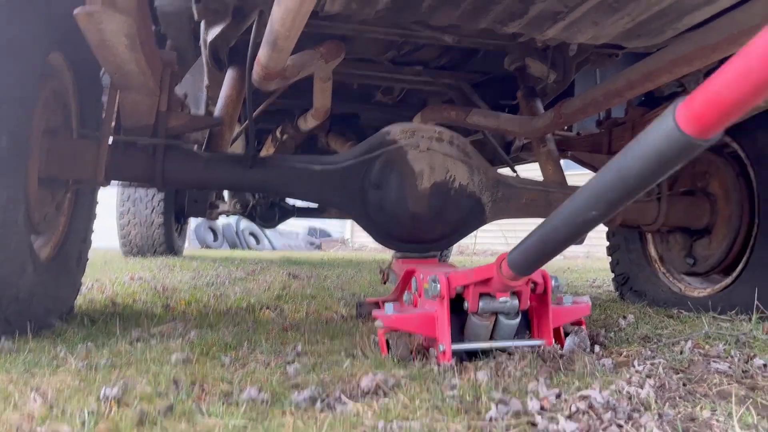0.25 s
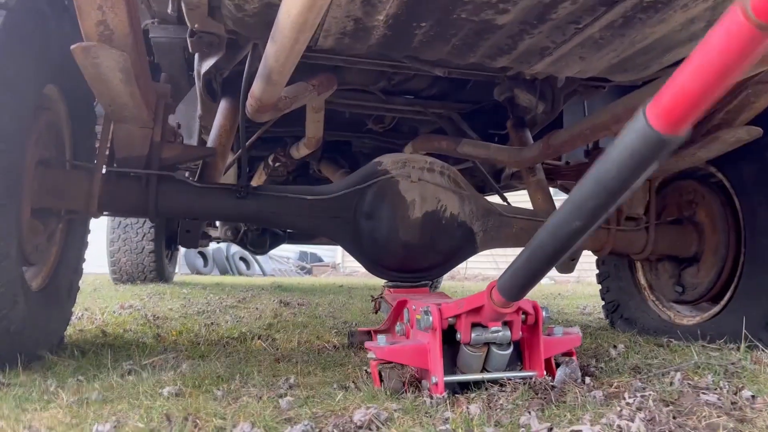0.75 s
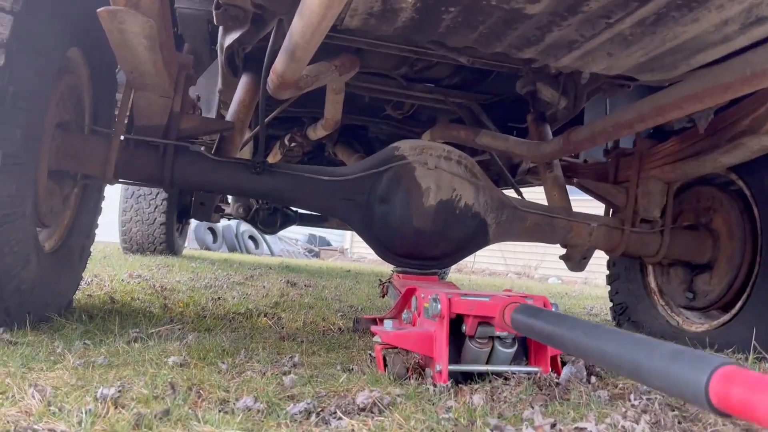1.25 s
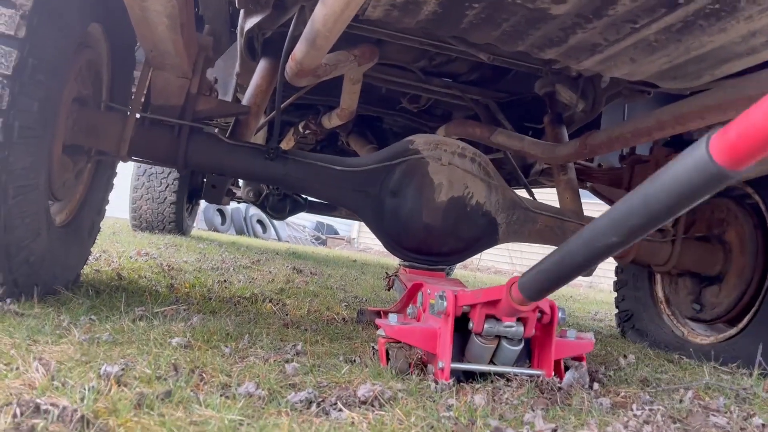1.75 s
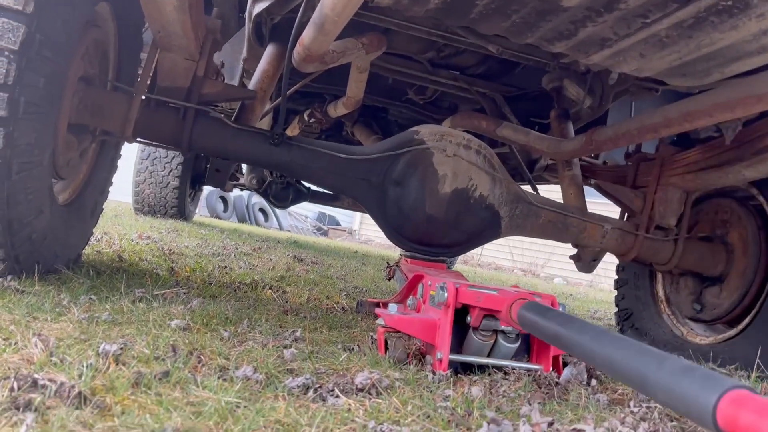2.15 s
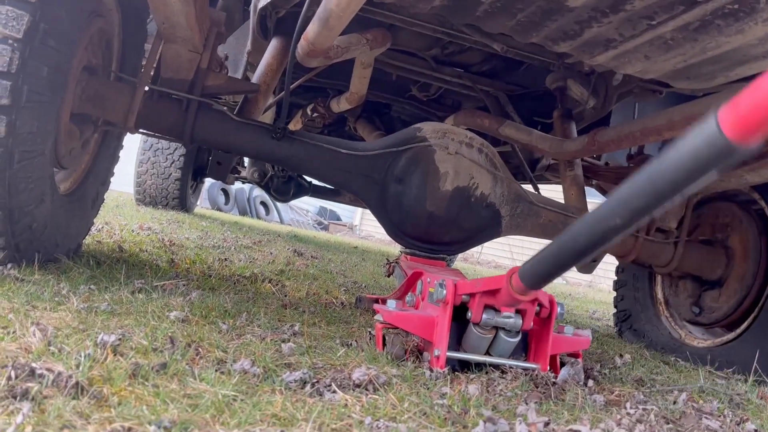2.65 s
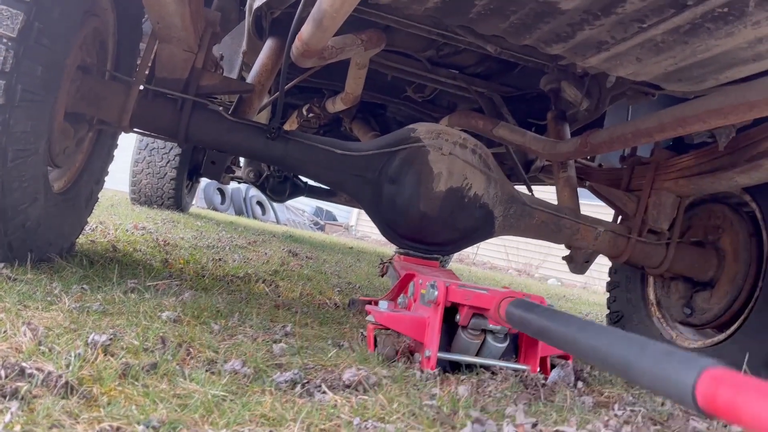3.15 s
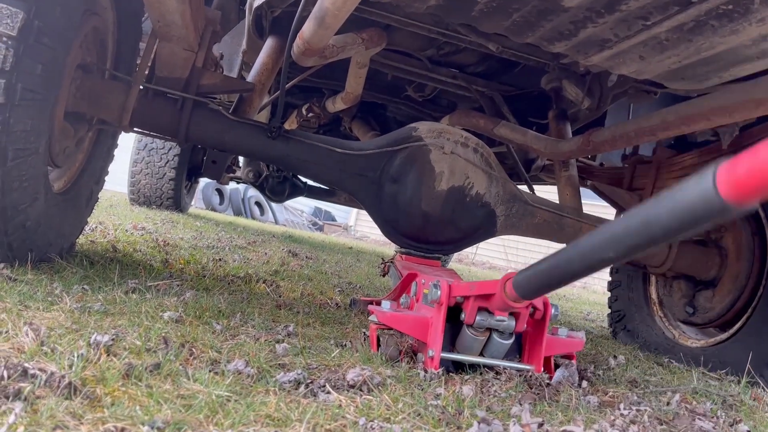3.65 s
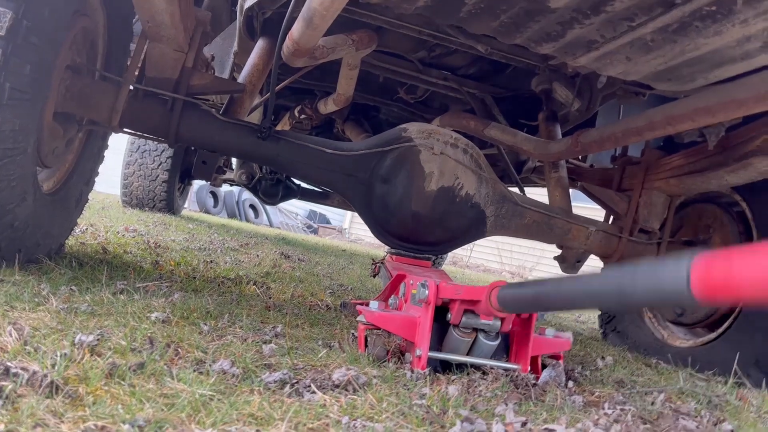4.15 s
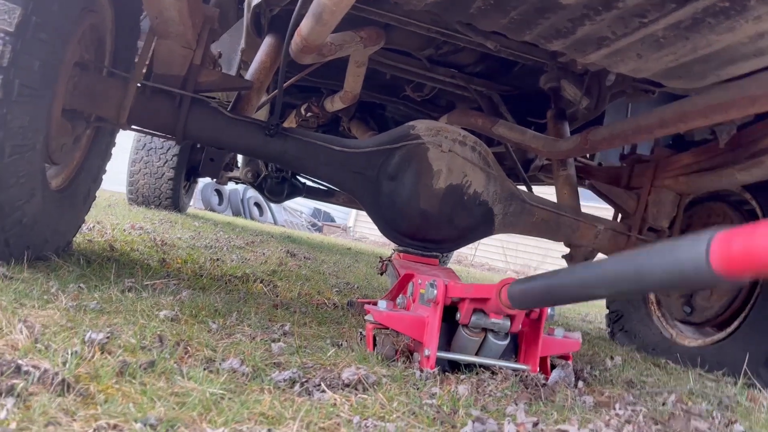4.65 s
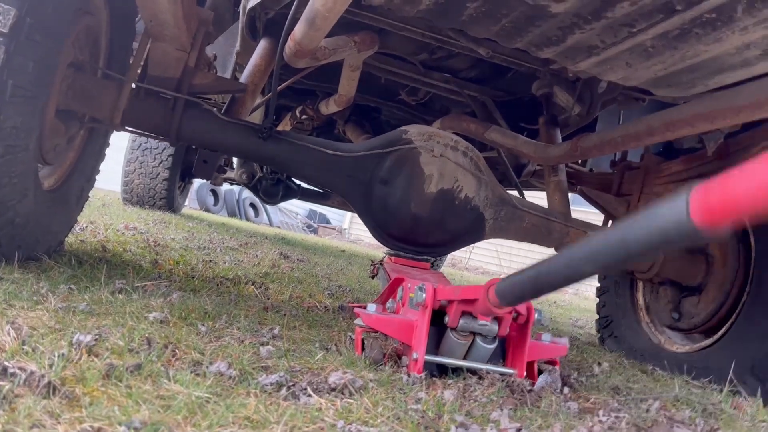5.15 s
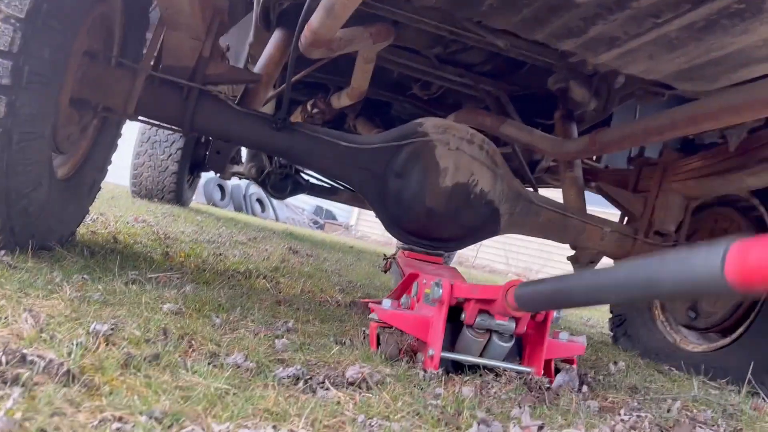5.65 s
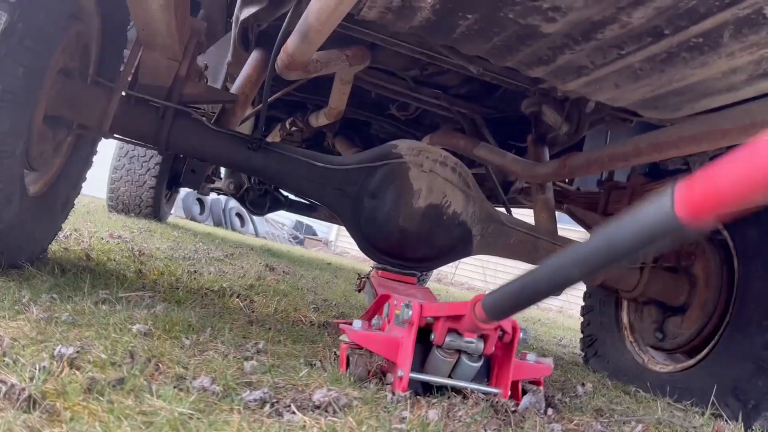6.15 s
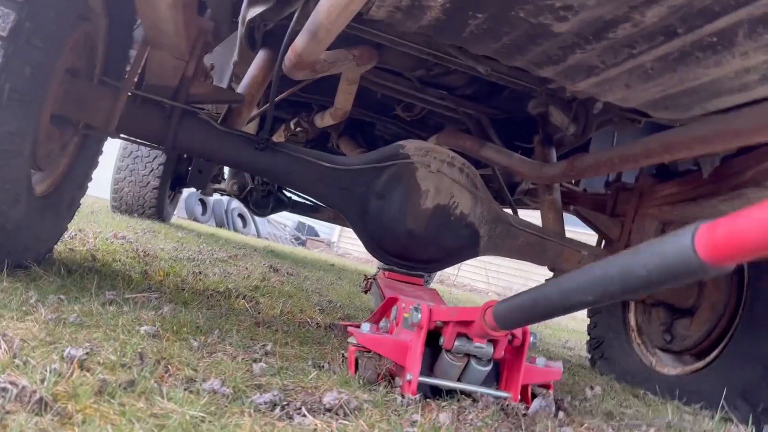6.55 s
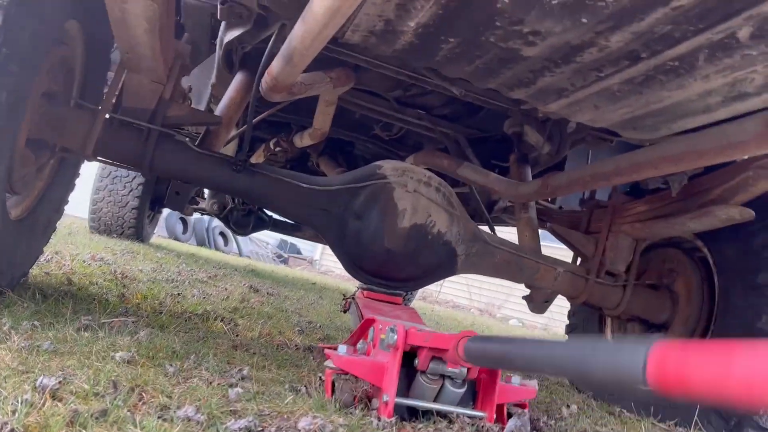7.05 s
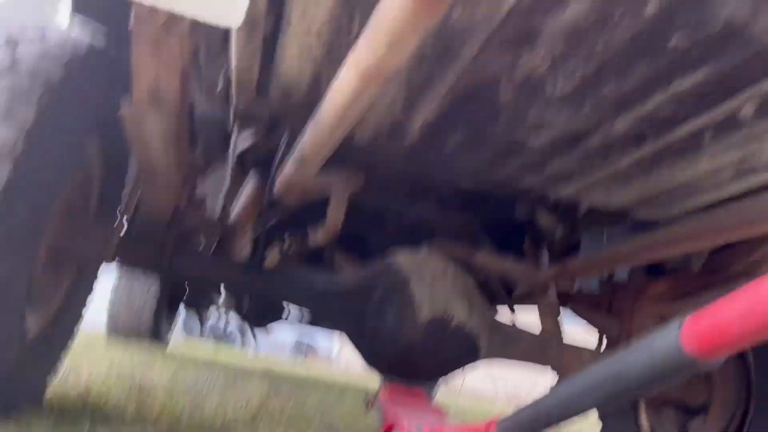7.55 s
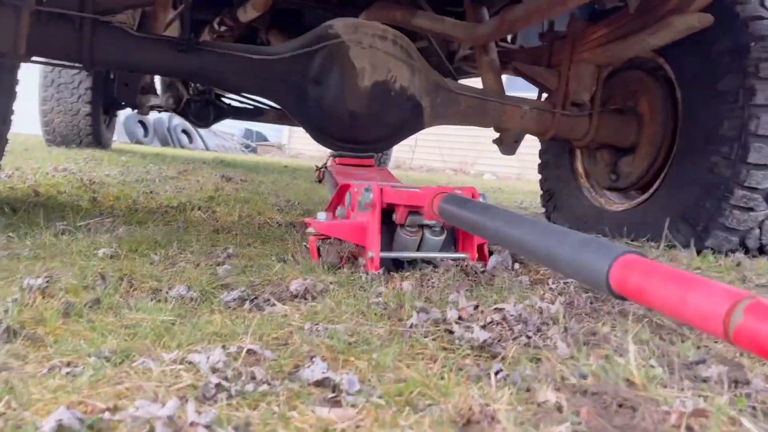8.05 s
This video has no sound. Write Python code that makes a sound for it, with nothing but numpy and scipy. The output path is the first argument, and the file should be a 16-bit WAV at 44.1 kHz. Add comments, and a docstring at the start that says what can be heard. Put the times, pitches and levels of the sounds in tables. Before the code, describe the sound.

Repeated metal clanks and dry ticks from a hydraulic floor jack being pumped, with faint pivot rubbing and one wind thump.

```python
"""A steel floor jack on grass is pumped by its long handle under a truck axle.
Its loose pins clank at the ends of each stroke, the loaded frame ticks and the wheels knock on the
ground. The pivots rub and squeak once, cloth swishes with the handle, and oil groans and hisses as
it is forced through the valve. Behind it lie a far rumble and a steady outdoor wash of noise,
and one gust of wind thumps the microphone."""
import sys
import numpy as np
from scipy import signal
from scipy.fft import rfft, irfft, next_fast_len
from scipy.io import wavfile
from scipy.ndimage import uniform_filter1d

SR = 44100
rng = np.random.default_rng(int(sys.argv[2]) if len(sys.argv) > 2 else 0)


def waveform_to_disk(signal):
    """Save audio, clipped to [-1, 1], as 16-bit WAV at the path in sys.argv[1]."""
    frames = np.transpose(np.atleast_2d(signal))
    scaled = np.clip(frames, -1, 1) * 32767
    samples = np.round(scaled).astype(np.int16)
    wavfile.write(sys.argv[1], SR, samples)


N = 366030

# The notes the jack's steel rings at: f/Hz, level/dB, time to fade by 60 dB/s
STEEL_NOTES = [(448.5, -7.5, 0.066), (946, -9.5, 0.078), (1203, 6, 0.015), (1510, -8.5, 0.17),
               (1764, -7, 0.15), (2272, -1.5, 0.076), (2787, 6.5, 0.039), (3190, -1, 0.057),
               (3480, -6, 0.069), (4300, 7.5, 0.069), (4900, -15, 0.44), (6080, -3.5, 0.046),
               (8600, 11, 0.051)]
# Metal hitting metal: t/s, level/dB, main pitch f/Hz, heaviness/dB, extra sharpness/dB
CLANKS = [(0.087, -26.5, 1273, 3, 3), (0.096, -26.5, 1670, 10.5, 13), (0.13, -44, 5500, -5, 16),
          (0.5027, -19, 4410, 2, 3), (0.545, -30, 1545, 1, 2), (1.375, -37, 5500, 6, 10),
          (2.3415, -11.5, 3320, -4, -5.5), (2.347, -13, 3660, 2, -13), (2.354, -19.5, 2200, 4, 2),
          (2.692, -22, 1990, 13, 3.5), (2.704, -28, 1920, 5, 0), (2.729, -30, 1700, 2, 0),
          (2.742, -27, 1820, 7, 3), (3.256, -26.5, 3940, 6.5, 5), (3.598, -22.5, 2080, 14, 1),
          (3.61, -28, 1760, 7, 8), (3.635, -30.5, 2180, 4, 0), (3.652, -23.5, 1400, 5, -2),
          (3.665, -31, 1760, 3, -2), (4.141, -26, 4300, 4, 12), (4.147, -21, 1620, -2, 7),
          (4.152, -10, 2860, 9, -4), (4.158, -11.5, 4540, 2, -1), (4.163, -14, 1835, 6.5, 6),
          (4.168, -27, 4940, 10, -3), (4.491, -24, 2050, 14.5, 0), (4.498, -27, 1840, -7, 8),
          (4.528, -27.5, 2080, 4, 5), (4.55, -24.5, 1760, 6, -5), (5.078, -25, 4270, 12, 0),
          (5.084, -14, 2920, 10, -3), (5.09, -11.5, 4550, 10.5, -4.5), (5.102, -17.5, 2380, 10, -8),
          (5.13, -18.5, 3950, 0, 0), (5.134, -30, 4960, 10, -4), (5.146, -26, 1670, -4, 0),
          (5.434, -23.5, 1700, 9, 5), (5.443, -26, 1790, 7, 0), (5.464, -26, 2080, 5, -2),
          (5.492, -24, 1800, 9, 0), (5.658, -33.5, 5000, 4, 7), (6.059, -14.5, 1510, -14, 0),
          (6.0635, -8, 2760, 3, -7), (6.075, -10, 6200, 4, -6.5), (6.084, -14, 1950, 5.5, -3.5),
          (6.097, -23, 1700, 8, 0), (6.4, -21.5, 2040, 9.5, 3), (6.41, -25, 1650, 8, 6),
          (6.432, -31, 1890, -8, 5), (6.462, -23, 1820, 9, -5), (6.641, -34.5, 4700, 1, 4),
          (6.866, -26, 1440, 6, 0), (7.06, -23, 2740, 16, -3), (7.0744, -8, 2500, 2, 2.5),
          (7.081, -15, 2220, 7, -7), (7.095, -19, 1580, 3, -11), (7.115, -14.5, 4450, -5, -3),
          (7.393, -21, 2320, 12.5, -0.5), (7.403, -27.5, 2360, 10, 9), (7.424, -25.5, 1700, 4, 1),
          (7.464, -27, 1740, 14, 0), (8.212, -27, 1350, 12, 22), (8.231, -28.5, 4560, -5, 8)]
def clank(db, hz, heavy_db, sharp_db):
    """A loose pin hits the steel, which rattles and rings. The sound starts after a 200-sample lead-in."""
    t = np.arange(7800) / SR
    near = lambda f, octaves: np.exp(-(np.log2((f + 1) / hz) / octaves) ** 2)  # 1 at the blow's pitch
    ring = 0
    for (f, note_db, fade_s), luck in zip(STEEL_NOTES, rng.random((len(STEEL_NOTES), 4, 1))):
        # notes near the blow's pitch ring most, above all the long ones
        boost_db = (7 + 24 * fade_s) * near(f, 0.083) - 4 + 3 * luck[2]
        if f < 1000:  # a heavy blow brings out the frame's low notes
            boost_db += 4 + 0.12 * heavy_db
        detuned_hz = f * (1 + 0.0031 * (2 * luck[3] - 1))
        tone = np.sin(2 * np.pi * (detuned_hz * t + luck[:2]))
        ring += gain_of(note_db + boost_db - 60 * t / fade_s) * tone
    # the first contact is hardest, then the pin bounces in its hole
    crack = gain_of(12 - 60 * t / .018) + gain_of(-60 * t / .09)
    bounce = 1 + .4 * wobble(len(t), 60) * np.minimum(t / .004, 1)
    rattle = rng.standard_normal((2, len(t))) * crack * abs(bounce)
    # the steel lifts the rattle at its stronger notes
    strong_hz = [f for f, note_db, _ in STEEL_NOTES if note_db > -9]
    lift_db = lambda f: sum(8.6 / (1 + ((f - note) / (0.041 * note)) ** 2) for note in strong_hz) - 3
    rattle = filtered(rattle, lift_db)
    shake = 1 + .4 * wobble(len(t), 150) * np.exp(-t / .015)  # loose joints shake, then settle
    ring *= gain_of(-8 + 0.62 * heavy_db) * shake  # heavy blows ring more
    sound = np.pad((ring + rattle) * np.minimum(t / .0004, 1), ((0, 0), (200, 0)))
    # smaller parts and harder hits sound brighter
    treble_db = sharp_db - 13 + 16 * np.log2(hz / 2000) + 0.76 * (db + 13)
    colour = [(150, heavy_db - 13), (600, heavy_db - 3.5), (920, heavy_db), (hz, -3),
              (min(2 * hz, 9000), treble_db), (10000, treble_db),
              (14000, treble_db - 13), (16500, treble_db - 17)]
    focus_db = lambda f: 3 * near(f, 0.07) + (6 - .45 * heavy_db) * near(f, 0.25)
    sound = filtered(sound, lambda f: look_up(colour, f) + focus_db(f))
    sound = sound[:, :7000] * np.minimum(np.arange(7000, 0, -1) / 2000, 1)
    rough_peak = 3.11 * np.sqrt(np.mean(sound[:, 200:500] ** 2))
    return gain_of(db) * sound / rough_peak


# Dry ticks of the frame: t/s, level/dB, f/Hz, snap compared with the tone/dB
TICKS = [(0.858, -29, 1210, -17), (0.922, -30, 580, -23), (1.095, -32.5, 990, -18),
         (1.176, -27.5, 1250, -27), (1.32, -23.5, 1210, 3), (1.353, -28, 1310, -22), (1.736, -32, 980, -4),
         (1.994, -30.5, 1020, -5), (2.285, -33.5, 805, -14), (2.454, -36, 900, -8),
         (2.491, -28.5, 905, -20), (2.916, -31, 1050, 0), (2.979, -32, 1000, 7), (3.028, -24.5, 1190, 3),
         (3.194, -30.5, 884, -18), (3.288, -30.5, 1360, -20), (3.419, -25.5, 940, -27),
         (3.783, -30, 1500, -23), (3.896, -19.5, 1240, 6), (3.905, -33, 1500, 2), (4.289, -31, 1680, -15),
         (4.297, -24.5, 920, -6), (4.316, -33.5, 1730, -15), (4.392, -25.5, 740, -28),
         (4.679, -30, 1740, -7), (4.792, -20, 1100, 7.5), (4.886, -31, 760, -18), (5.247, -29.5, 860, -22),
         (5.572, -33, 1550, -20), (5.765, -29.5, 1780, 9), (5.817, -19, 1120, 1.5), (5.978, -28, 950, 12),
         (6.21, -26, 835, -12), (6.571, -33.5, 1680, -15), (7.204, -31, 900, 14), (7.274, -31, 1460, -15),
         (7.22, -24, 870, -25), (8.287, -26, 1060, 0)]
def tick(db, hz, snap_db):
    """The loaded frame settles: a short tone, a bright snap and a faint echo off ground and truck."""
    t = np.arange(SR // 16) / SR
    snap = np.sin(2 * np.pi * 3400 * t) + 0.61 * np.sin(2 * np.pi * 2200 * t)
    snap *= gain_of(snap_db - 60 * t / 0.0051)
    click = (np.sin(2 * np.pi * hz * t) + snap) * struck(t, rise_s=0.001, fade_s=0.0093)
    echo = filtered(rng.standard_normal((2, len(t))), lambda f: -9 * abs(np.log2((f + 1) / (0.83 * hz))))
    sound = click + 0.14 * normalised(echo) * struck(t, rise_s=0.00091, fade_s=0.065)
    return gain_of(db) * sound / abs(click).max()


# Dull knocks of the wheels: t/s, level/dB, f/Hz
KNOCKS = [(0.834, -35, 434), (0.851, -31, 440), (1.354, -38, 464), (1.734, -38, 426), (6.07, -27.5, 499)]
def knock(db, hz):
    """A wheel presses into the ground with a short, low ring."""
    t = np.arange(SR // 10) / SR
    ring = np.sin(2 * np.pi * hz * t) * struck(t, rise_s=0.00069, fade_s=0.097)
    return np.tile(gain_of(db) * ring, (2, 1))


# The path of the one squeak: t/s, f/Hz, level/dB
SQUEAK = [(2.845, 2210, -64), (2.875, 2250, -55), (2.9, 2265, -48), (2.915, 2330, -45.5),
          (2.925, 2290, -60)]
def squeak():
    """A dry pivot slips unevenly, making a shaky, sliding tone."""
    times, hz, db = np.transpose(SQUEAK)
    t = np.arange(times[0], times[-1], 1 / SR)
    phase = 2 * np.pi * np.cumsum(np.interp(t, times, hz)) / SR
    tone = (np.sin(phase) + 0.35 * np.sin(2 * phase)) * gain_of(np.interp(t, times, db))
    tone *= (1 + 0.4 * wobble(len(t), 80)) * signal.windows.tukey(len(t), .1)
    out = np.zeros((2, N))
    add(out, times[0], np.tile(tone, (2, 1)))
    return out


# Handle swings: fastest moment t/s, 12 dB rise time/s, 12 dB fall time/s, cloth level/dB, pivot level/dB
SWINGS = [(.34, 0.61, 0.11, -57, -52), (.6, 0.38, 0.13, -58, -52), (.86, 0.084, 0.37, -56.5, -49),
          (1.18, 0.093, 0.92, -53.5, -45.5), (1.58, 0.07, 0.084, -46, -44), (1.73, 0.046, 0.035, -55, -46),
          (2.16, 0.55, 0.25, -55.5, -48), (2.54, 0.29, 0.12, -51, -43.5), (2.72, 0.026, 0.025, -48, -48),
          (2.89, 0.29, 0.078, -55, -51), (3.03, 0.1, 0.58, -54, -45), (3.49, 0.22, 0.11, -49, -45.5),
          (3.64, 0.047, 0.067, -52, -45), (3.74, 0.039, 0.056, -51, -44), (3.95, 0.12, 0.19, -49, -42.5),
          (4.36, 0.16, 0.092, -46, -44), (4.53, 0.047, 0.2, -51.5, -43), (4.891, 0.11, 0.19, -48, -40),
          (5.31, 0.26, 0.079, -48, -44.5), (5.456, 0.021, 0.046, -44, -40), (5.6, 0.1, 0.072, -52.5, -43.5),
          (5.9, 0.19, 0.17, -48.5, -39.5), (6.28, 0.24, 0.091, -51, -43.5), (6.42, 0.027, 0.14, -52, -43.5),
          (6.898, 0.048, 0.04, -44, -35.5), (7.27, 1, 0.088, -52, -45.5), (7.43, 0.035, .1, -60, -48),
          (7.56, 0.16, 0.1, -57.5, -47), (8.021, 0.19, 0.049, -47, -42), (8.2, 0.32, 0.28, -53.5, -46.5)]
def swing_loudness(column):
    """A handle sound is loudest when the swing is fastest, and fades away on both sides."""
    t, power = np.arange(0, N + 64, 64) / SR, 0
    for swing in SWINGS:
        fastest, rise, fall = swing[:3]
        away = np.where(t < fastest, (fastest - t) / rise, (t - fastest) / fall)
        power += gain_of(swing[column] - 12 * away ** 1.06) ** 2
    return np.interp(np.arange(N) / SR, t, np.sqrt(power))


# Tone colour of the cloth: f/Hz, relative level/dB
CLOTH_COLOUR = [(1500, -7), (3300, -2.5), (5300, 1.5), (7000, -5), (9000, -4.5), (12000, -14.5),
                (15500, -14)]
def cloth_swish():
    """Cloth moves with the handle and makes a bright hiss."""
    hiss = noise(lambda f: look_up(CLOTH_COLOUR, f), 256, flicker_db=2.5, patch_s=0.028, patch_hz=2450)
    return hiss * swing_loudness(column=3)


# Tone colour of the pivots: f/Hz, relative level/dB
PIVOT_COLOUR = [(400, -4.5), (1000, 6.5), (1900, 0), (2600, -6), (3300, -5.5), (4500, -13.5), (7000, -46)]
def pivot_rub():
    """The pivots rub as the handle swings, with about 110 tiny crackles a second."""
    rub = noise(lambda f: look_up(PIVOT_COLOUR, f), 256, flicker_db=2.03, patch_s=.03, patch_hz=700)
    strengths = gain_of(3 * np.minimum(rng.exponential(1, N), 2))
    clicks = uniform_filter1d(strengths * (rng.random(N) < 110 / SR), 24)
    crackles = signal.lfilter([1.2], [1, -np.exp(-1 / (.0013 * SR))], clicks)  # each dies in a few ms
    return normalised(rub * (1 + 0.94 * crackles)) * swing_loudness(column=4)


# The pitches the oil groans at: f/Hz, width/Hz, relative level/dB
GROAN_BANDS = [(1494, 200, 15), (1745, 130, 10), (2290, 240, -1), (3360, 910, -7.5)]
# Pushes of oil: start t/s, length/s, level/dB
OIL_PUSHES = [(.35, 0.58, -59), (1.45, 0.35, -51.5), (3.058, 0.6, -48), (3.606, 0.43, -50),
              (5.1, 0.31, -47.5), (5.465, 0.29, -47), (7.188, 0.16, -46.5), (7.486, 0.12, -47),
              (7.63, 0.23, -46.5)]
def oil_groan():
    """Oil forced through the valve groans at fixed pitches; each push swells and fades."""
    def valve_db(f):
        bands = (gain_of(2 * db) / (1 + (2 * (f - hz) / width) ** 4) for hz, width, db in GROAN_BANDS)
        return 10 * np.log10(sum(bands))
    groan = noise(valve_db, 1024, flicker_db=4.5, patch_s=.04, patch_hz=300)
    t, pressure = np.arange(N) / SR, 0
    for start, length, db in OIL_PUSHES:
        pressure += gain_of(db) * np.sin(np.pi * np.clip((t - start) / length, 0, 1)) ** 0.85
    return pressure * groan


# Jets of oil: start t/s, length/s, level/dB, first f/Hz, last f/Hz
OIL_JETS = [(1.503, 0.26, -64, 3280, 3380), (1.84, 0.21, -62, 3150, 4060), (2.385, 0.23, -61, 3200, 3180),
            (3.002, 0.62, -60.5, 3450, 3220), (5.53, 0.16, -62, 3250, 3380), (5.684, 0.25, -64, 3400, 3450)]
def oil_hiss(width_hz=220):
    """Oil squirts through a narrow opening, with a hiss whose pitch drifts with the pressure."""
    out = np.zeros((2, N))
    lowpass = signal.butter(2, width_hz / 2, fs=SR, output="sos")
    for start, length, db, from_hz, to_hz in OIL_JETS:
        t = np.arange(0, length, 1 / SR)
        phase = 2 * np.pi * np.cumsum(from_hz + (to_hz - from_hz) * t / length) / SR
        slow_noise = signal.sosfilt(lowpass, rng.standard_normal((2, 2, len(t))))
        hiss = slow_noise[0] * np.cos(phase) - slow_noise[1] * np.sin(phase)  # moved up to the pitch
        add(out, start, gain_of(db) * normalised(hiss) * np.sin(np.pi * t / length) ** 0.44)
    return out


# Swirls of air in the gust: middle t/s, level/dB, f/Hz, length/cycles
SWIRLS = [(3.299, -21.5, 56, 2.6), (3.636, -19, 102, 0.88), (3.642, -10.5, 168, 1.6), (3.672, -19, 133, 4),
          (3.702, -16.5, 100, 5.3), (3.72, -15, 141, 2.4), (3.741, -7, 153, 0.77), (3.756, -19.5, 80, 3.4),
          (3.795, -19, 87, 1.2), (3.848, -16, 126, 1), (3.863, -25, 44.7, 1.5)]
def wind_gust():
    """Each swirl pushes the microphone back and forth for a moment, making a low thump."""
    out = np.zeros((2, N))
    t = np.arange(-2205, 2205) / SR
    for middle, db, hz, cycles in SWIRLS:
        phase = 2 * np.pi * (hz * t + rng.random((2, 1)))
        push = np.cos(phase) + 0.3 * np.cos(2.26 * phase)  # a lopsided push adds a higher tone
        add(out, middle + t[0], gain_of(db) * push * np.exp(-(2 * t * hz / cycles) ** 2))
    return out


# Tone colours of the far rumble and the outdoor wash: f/Hz, relative level/dB
RUMBLE_COLOUR = [(15, -42), (25, -15), (41, -25.5), (70, 3), (86, -1), (108, -11.5), (140, -6), (214, -16),
                 (250, -17), (320, -90), (550, -120)]
WASH_COLOUR = [(80, -24), (150, -3), (220, 0), (350, -3.5), (500, -10), (800, -19.5), (1500, -23),
               (3000, -35), (7000, -40), (15500, -41.5)]
# How loud the rumble is heard: t/s, level/dB
RUMBLE_LEVEL = [(0, -32), (.4, -35.5), (1.15, -36), (1.5, -34), (1.7, -36), (2.9, -36), (3.3, -32.5),
                (3.6, -29.5), (3.75, -23.5), (3.9, -32), (4.07, -43.5), (4.45, -50), (4.55, -37.5),
                (6.3, -35.5), (7.2, -33.5), (7.9, -36), (8.3, -35)]
def background():
    """A low rumble swells with the gust, then the bass is briefly turned down, over a steady wash."""
    rumble = noise(lambda f: look_up(RUMBLE_COLOUR, f), 2048, flicker_db=1.5, patch_s=.08, patch_hz=40)
    wash = noise(lambda f: look_up(WASH_COLOUR, f), 1024, flicker_db=3, patch_s=.05, patch_hz=152.5)
    rumble_db = np.interp(np.arange(N) / SR, *np.transpose(RUMBLE_LEVEL))
    return gain_of(rumble_db) * rumble + gain_of(-44) * wash


def gain_of(db):
    """Turns decibels into a number to multiply by."""
    return 10 ** (np.asarray(db) / 20)


def normalised(x):
    """Scales a signal to an average strength (rms) of 1."""
    return x / np.sqrt(np.mean(x ** 2) + 1e-20)


def struck(t, rise_s, fade_s):
    """The loudness of a hit: a quick rise, and a fall of 60 dB in fade_s."""
    return gain_of(-60 * t / fade_s) * np.minimum(t / rise_s, 1)


def wobble(samples, smoothing):
    """A random wiggle; more smoothing makes it slower."""
    return normalised(uniform_filter1d(rng.standard_normal(samples), smoothing))


def look_up(points, hz):
    """Reads between a table's rows, along a scale of octaves."""
    f, value = np.transpose(points)
    return np.interp(np.log(hz + 1), np.log(f + 1), value)


def add(mix, start, sound):
    """Mixes a sound in at a start time in seconds."""
    part = mix[:, round(start * SR):][:, :sound.shape[1]]
    part += sound[:, :part.shape[1]]


def filtered(x, shape_db):
    """Turns each frequency f up or down by shape_db(f)."""
    hz = np.fft.rfftfreq(x.shape[1], 1 / SR)
    return irfft(rfft(x) * gain_of(shape_db(hz)), x.shape[1])


def noise(shape_db, size, flicker_db, patch_s, patch_hz):
    """Two noises of one colour, built in blocks of size samples, flickering in random patches."""
    hop = size // 4
    frames, hz = N // hop + 5, np.fft.rfftfreq(size, 1 / SR)
    a, b, c, d, patches = rng.standard_normal((frames, len(hz), 5)).T
    patches = uniform_filter1d(patches, max(1, round(patch_hz * size / SR)), 0)
    patches = normalised(uniform_filter1d(patches, max(1, round(patch_s * SR / hop)), 1))
    spectra = np.array([a + 1j * b, c + 1j * d]) * gain_of(shape_db(hz)[:, None] + flicker_db * patches)
    return normalised(signal.istft(spectra, nperseg=size, noverlap=size - hop)[1][:, :N])


# How far the left wave runs ahead, for the jack's hits and squeak and for the rest: f/Hz, lead/radians
JACK_LEAD = [(0, 0), (300, .3), (650, -1.9), (850, -.5), (1350, -3), (1650, -3), (1800, -5.3), (2600, -6),
             (3300, -4.2), (4500, -5.8), (5500, -7.6), (7000, -8.2), (7900, -9.4), (8900, -9.5),
             (11000, -12.5), (13000, -12.7), (14600, -15.7)]
REST_LEAD = [(0, 0), (550, 1), (700, -.3), (1300, -1.9), (1750, .5), (2700, 1.5), (3300, .3), (4500, .5),
             (5500, -.8), (7000, -1.8), (7900, -3.1), (8900, -3.2), (11000, -6.2), (13000, -6.4),
             (14600, -9.4)]
# How much louder the left side is: f/Hz, level/dB
LEFT_BOOST = [(80, 0), (350, 3), (780, 1), (1250, -1), (2000, 3.5), (2500, 4), (3300, 7), (5500, 9.5),
              (8500, -1), (15000, 0.5)]
# How alike the two sides are at a spread of 1: f/Hz, likeness from 0 to 1
LIKENESS = [(60, 0.98), (260, 0.86), (680, 0.26), (1200, 0.1), (3000, 0.33), (6500, 0.3), (7800, 1),
            (15000, 1)]
def stereo(pair, lead, spread):
    """The microphone's left side hears the first signal; its right hears a shifted blend of both."""
    size = next_fast_len(N + 4096)
    hz = np.fft.rfftfreq(size, 1 / SR)
    first, second = rfft(pair, size)
    alike = np.clip(1 - spread * (1 - look_up(LIKENESS, hz)), 0, 1)
    lean = gain_of(look_up(LEFT_BOOST, hz) / 2)
    shift = np.exp(-1j * np.interp(hz, *np.transpose(lead)))
    right = (alike * first + np.sqrt(1 - alike ** 2) * second) * shift
    return irfft(np.array([first * lean, right / lean]), size)[:, :N]


def scene():
    """Mixes everything; the nearby jack's hits and squeak sound narrower than the rest."""
    jack = np.zeros((2, N))
    for start, *settings in CLANKS:
        add(jack, start - 200 / SR, clank(*settings))
    for start, *settings in TICKS:
        add(jack, start, tick(*settings))
    for start, *settings in KNOCKS:
        add(jack, start, knock(*settings))
    jack += squeak()
    rest = cloth_swish() + pivot_rub() + oil_groan() + oil_hiss() + background() + wind_gust()
    return stereo(jack, JACK_LEAD, spread=0.68) + stereo(rest, REST_LEAD, spread=0.81)


def record(dry):
    """The deepest bass (below 40 Hz) and the highest treble (above 16000 Hz) are cut away."""
    thinned = signal.sosfilt(signal.butter(2, 40, "highpass", fs=SR, output="sos"), dry)
    lowpass = signal.firwin(511, 16000, window=("kaiser", 9), fs=SR)
    return signal.oaconvolve(thinned, lowpass[None], "same")


dry = scene()
out = record(dry)
waveform_to_disk(out)
```